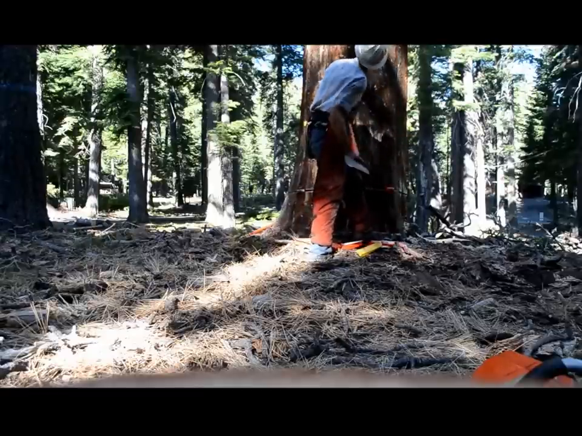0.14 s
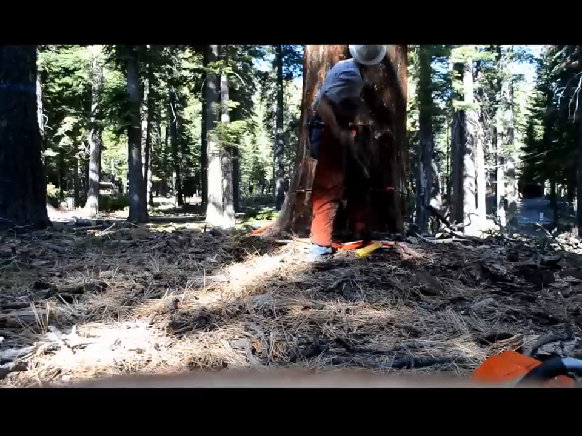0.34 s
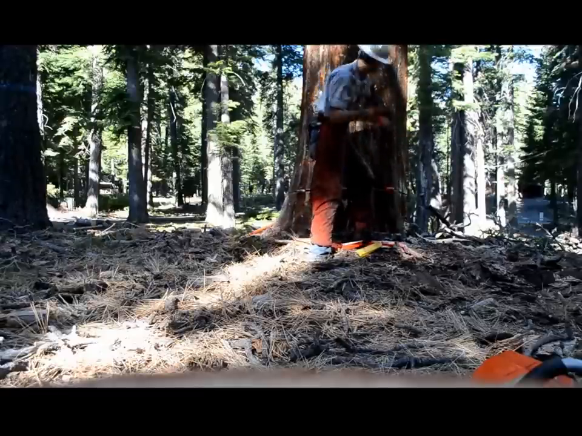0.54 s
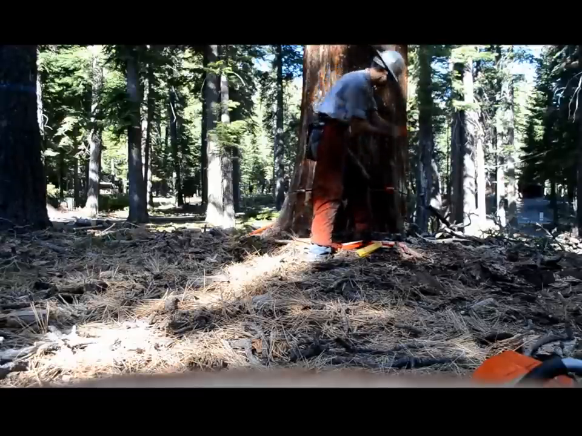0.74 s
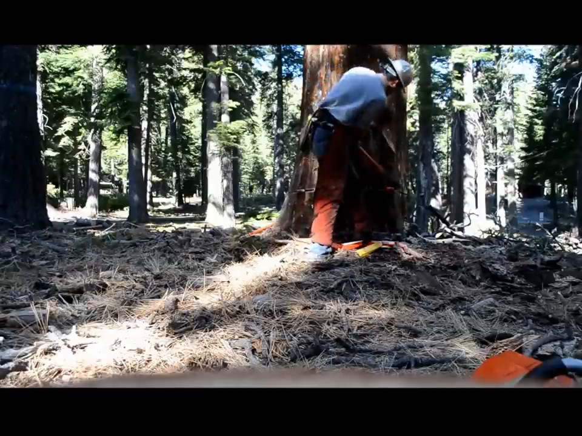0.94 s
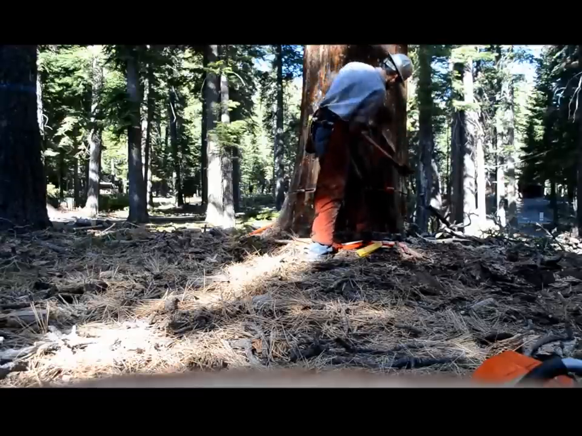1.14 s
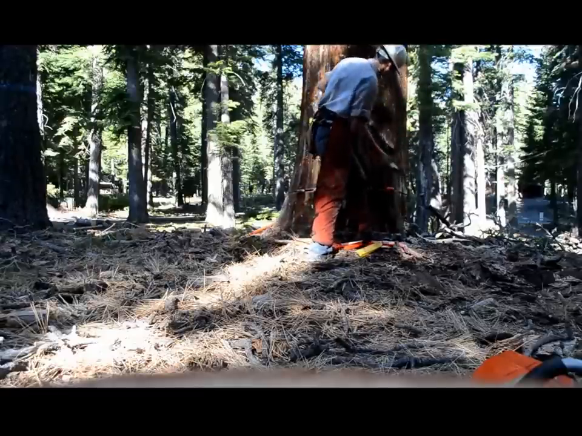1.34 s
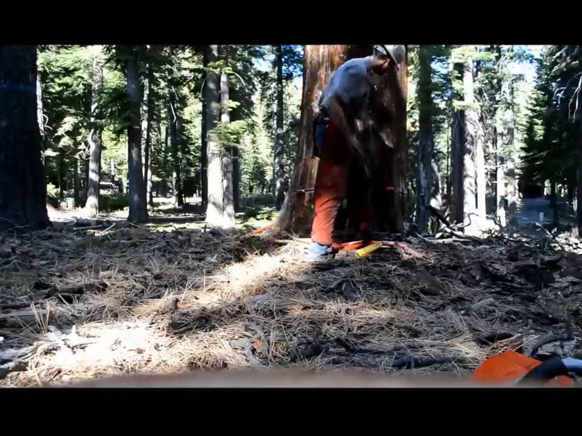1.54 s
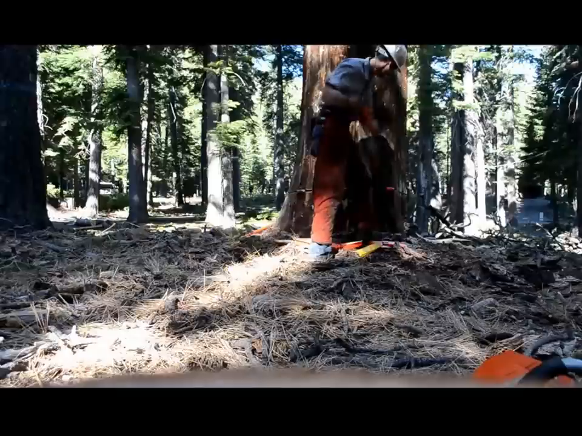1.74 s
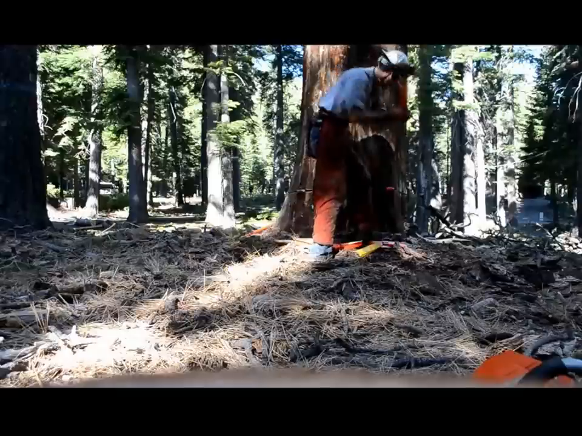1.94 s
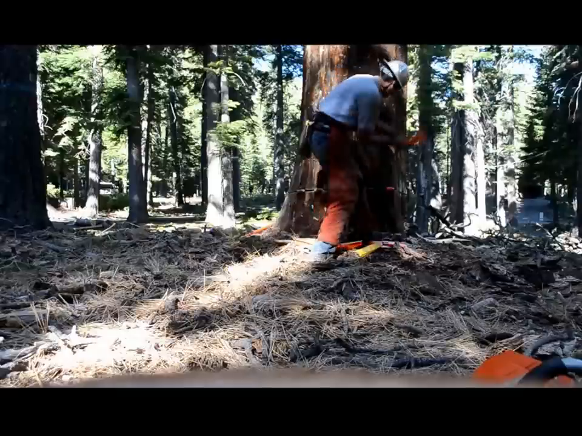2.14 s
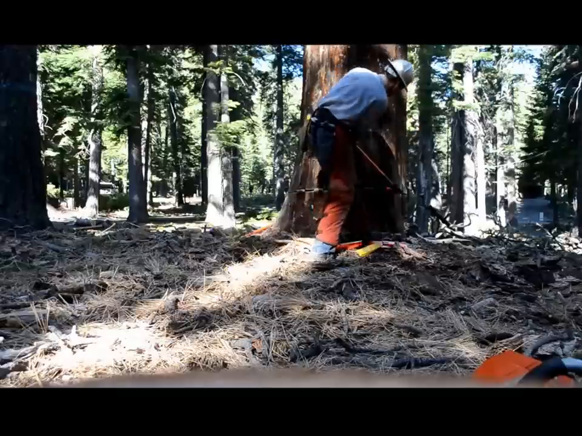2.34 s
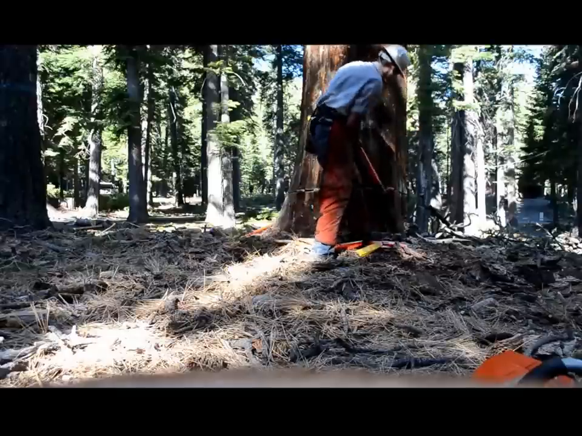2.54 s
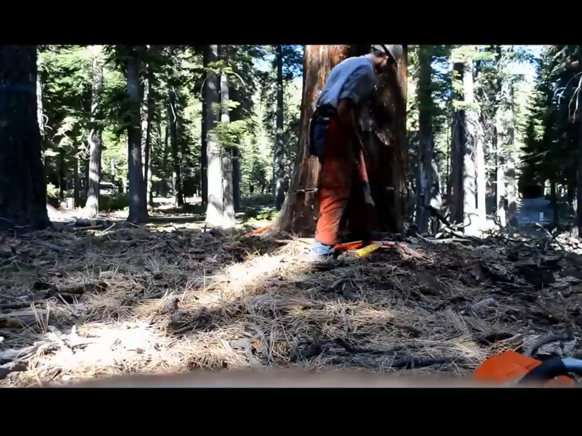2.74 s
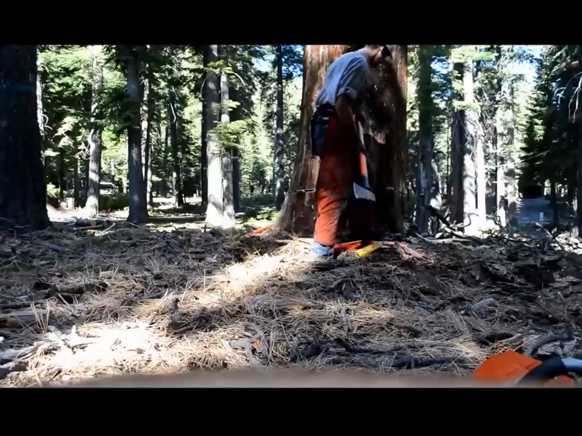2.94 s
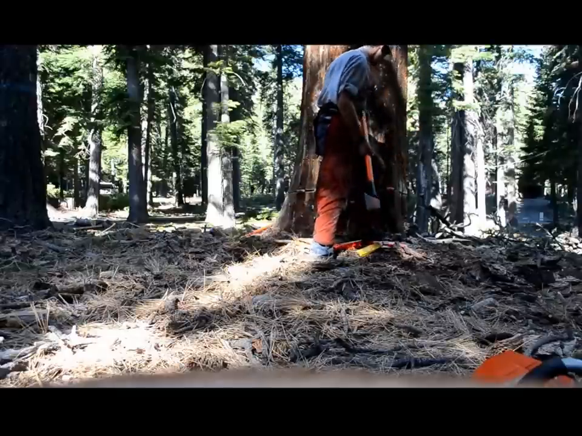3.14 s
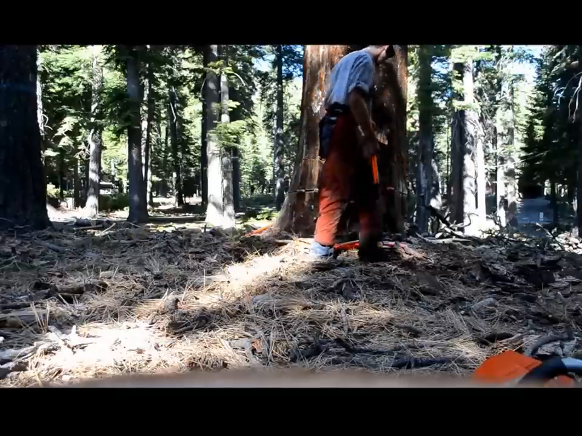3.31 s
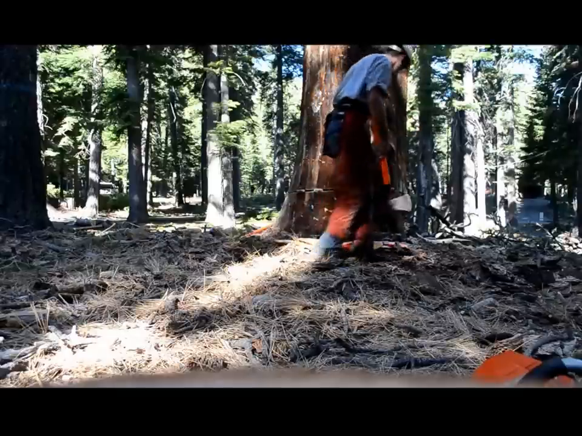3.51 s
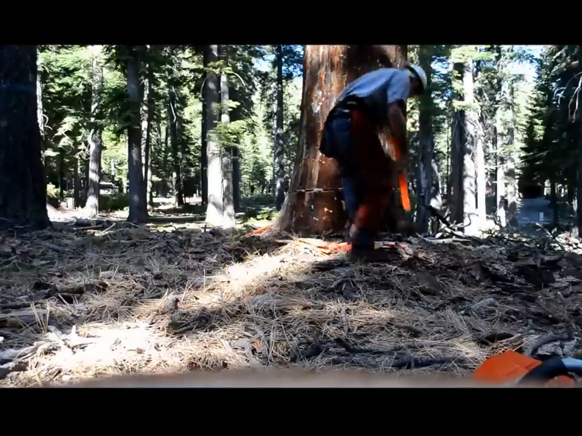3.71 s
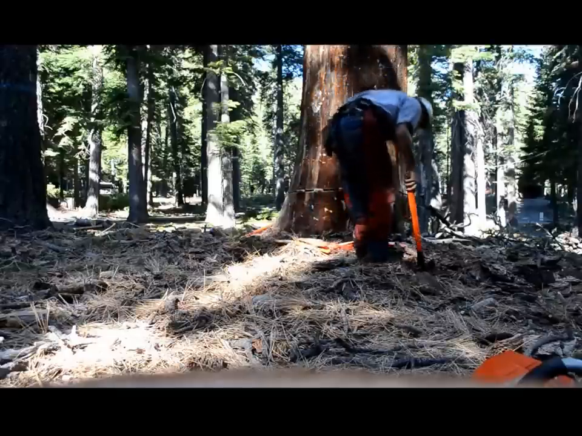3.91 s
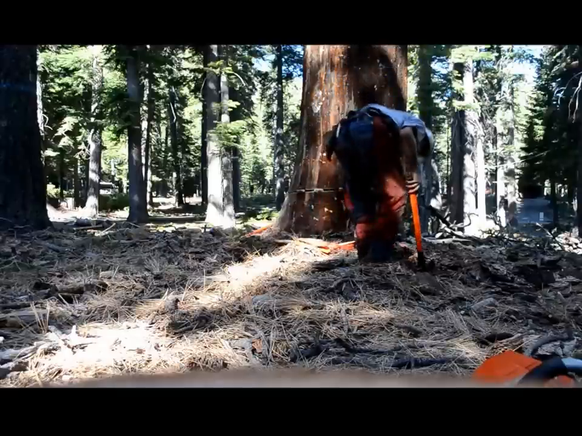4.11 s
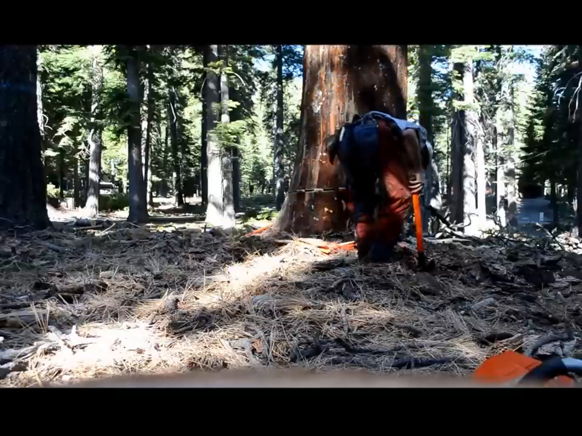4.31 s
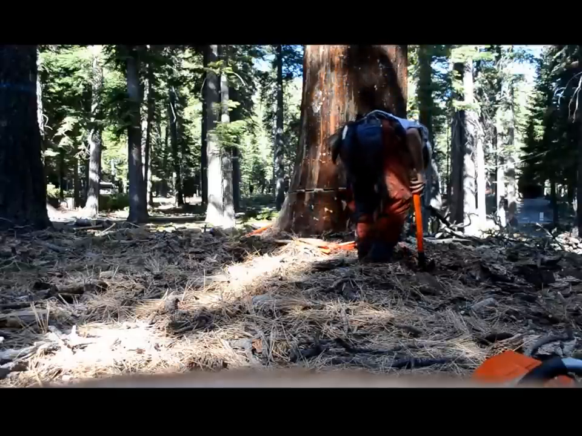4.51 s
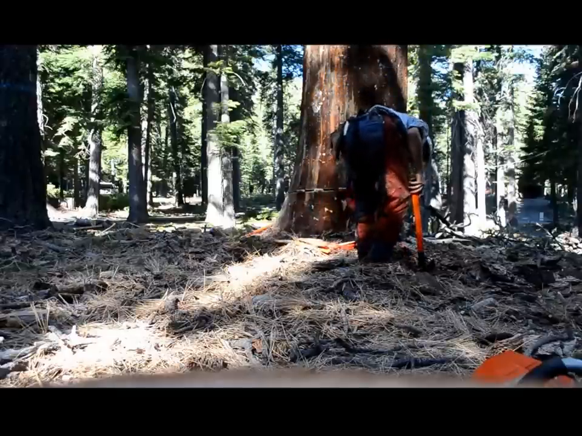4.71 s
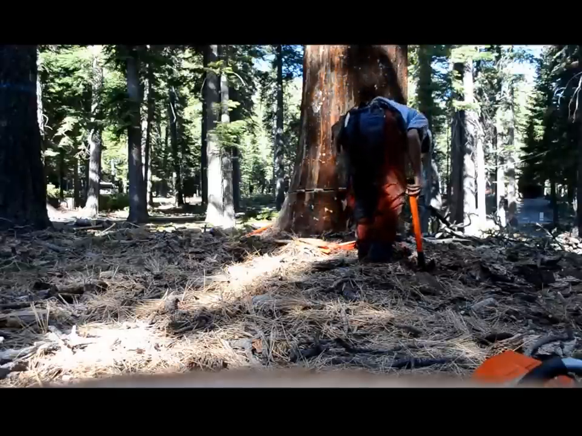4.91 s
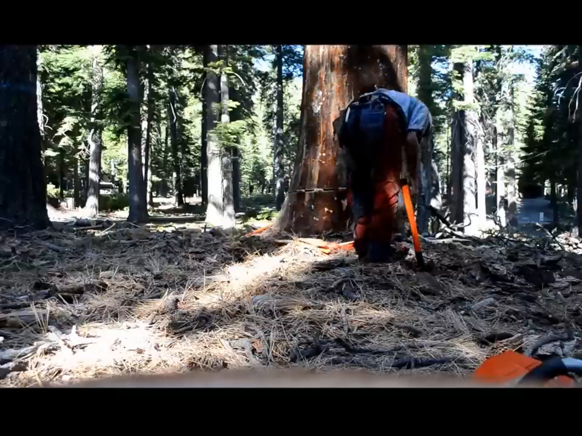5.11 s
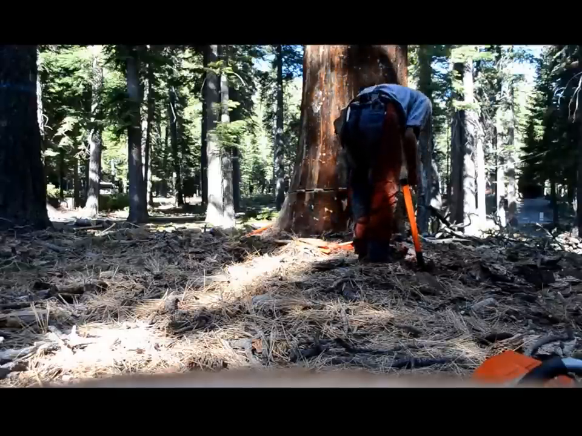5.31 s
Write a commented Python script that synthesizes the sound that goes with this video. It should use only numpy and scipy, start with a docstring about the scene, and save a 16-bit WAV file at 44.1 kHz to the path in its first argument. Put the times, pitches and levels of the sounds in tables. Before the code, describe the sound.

Two overloaded axe cracks on plastic wedges echo through a quiet conifer forest, then small twig ticks, litter rustles and a soft set-down thud.

```python
"""A quiet conifer forest, with the microphone some metres from a big trunk; an axe drives plastic wedges into it.
Each blow rings a wedge as decaying sines; the cracks overload the input and return from the trunks as echoes
and scattered noise. The axe is set down with low thuds; twigs tick and litter rustles under boots as filtered
noise, and random slips knock a loose wedge. Thin insect notes and a low hum that swells twice are wavering
sines, over the shaped noise of air in the crowns and a low rumble that stops early."""
import sys
import numpy as np
from scipy import signal
from scipy.io import wavfile
from scipy.ndimage import uniform_filter1d

SR = 44100
rng = np.random.default_rng(int(sys.argv[2]) if len(sys.argv) > 2 else 0)


def bounce(signal):
    """Save signal as a 16-bit WAV file at the path given by the first command-line argument."""
    frames = np.transpose(np.atleast_2d(signal))
    limited = np.clip(frames, -1, 1)
    pcm = np.round(limited * 32767).astype(np.int16)
    wavfile.write(sys.argv[1], SR, pcm)


N = 240863


def gain_of(db):
    """Decibels to amplitude."""
    return 10 ** (np.asarray(db) / 20)


def evened(x):
    """Scales to rms 1."""
    return x / np.sqrt(np.mean(x ** 2) + 1e-20)


def read(points, hz):
    """Interpolates the columns of a table on a log-frequency axis, each as an upright column."""
    table_hz, *columns = np.transpose(points)
    log_hz, log_table_hz = np.log(hz + 1), np.log(table_hz + 1)
    return np.array([np.interp(log_hz, log_table_hz, column) for column in columns])[:, :, None]


def add(mix, s, sound):
    """Mixes a sound in at time s, which may lie before the start."""
    at = round(s * SR)
    sound = sound[max(-at, 0):]
    part = mix[max(at, 0):][:len(sound)]
    part += sound[:len(part)]


def band(x, hz, octaves):
    """Band-pass around hz, reaching the given octaves to each side."""
    edges = np.clip([hz / 2 ** octaves, hz * 2 ** octaves], 20, SR * .45)
    return signal.lfilter(*signal.butter(2, edges, "band", fs=SR), x)


def ring(modes, tilt_db=0, spread=0.):
    """Decaying sines, each rising over about its first cycle; the tilt is in dB per octave about 1300 Hz."""
    t = np.arange(SR // 8) / SR
    total = 0
    for hz, db, t60 in modes:
        level = gain_of(db + tilt_db * np.log2(hz / 1300) - 60 * t / t60)
        rise = 1 - np.exp(-2.5 * hz * t)
        detuned_hz = hz * (1 + spread * rng.standard_normal())
        total = total + level * rise * np.sin(2 * np.pi * detuned_hz * t)
    return total


def coloured_click(points, tilt_db):
    """A causal pulse with the given spectrum: its minimum phase follows from the log gain."""
    hz = abs(np.fft.fftfreq(4096, 1 / SR))
    db = read(points, hz)[0, :, 0] + tilt_db * np.log2((hz + 30) / 1300)
    log_gain = np.log(gain_of(db))
    return np.fft.ifft(np.exp(np.conj(signal.hilbert(log_gain)))).real[:2048]


def tone(hz, db, throb_db, wobble):
    """A near sine that wavers about the given pitch (wobble: rms fraction) and rms level (throb: rms dB)."""
    draws = rng.standard_normal((SR // 2, 2))[:len(db)]
    pitch_drift, level_drift = (evened(uniform_filter1d(v, size=400)) for v in draws.T)
    turns = np.cumsum(hz * (1 + wobble * pitch_drift)) / SR
    return np.sqrt(2) * gain_of(db + throb_db * level_drift) * np.sin(2 * np.pi * turns)


def axe(echoes, scatter):
    """Every blow rings the wedge; near trunks return that ring, far trees blur it to a broad crack."""
    # Axe blows, the first before the start. Each row: start in seconds, strength in dB, treble tilt in dB per octave.
    blows = [(-.39, 9, 2.5), (0.9271, 11.5, 2.5), (2.244, 12, 3)]
    # Ring of struck wedge and trunk. Each row: pitch in Hz, level in dB before the tilt, t60 in seconds.
    wedge_modes = [(413, -14.5, 0.067), (607, -9, 0.034), (1003, -6, 0.021), (1286, 8.5, 0.01),
                   (1704, -2.5, 0.011), (2570, -5.5, 0.0023)]
    # Colour of the crack as it spreads among the trees. Each row: frequency in Hz, relative level in dB.
    snap = [(35, -65), (70, -23), (130, -27.5), (230, -11), (400, -8.5), (640, -9), (850, -13), (1050, -2),
            (1290, 2), (1650, -0.5), (2150, -10), (2800, -9.5), (3800, -19.5), (5000, -26), (9200, -34),
            (11500, -59)]
    snap_db = 22
    splinter_db, splinter_t60 = -6.5, 0.019  # short hiss of steel on plastic
    out, t = np.zeros(N), np.arange(SR // 40) / SR
    for s, db, tilt_db in blows:
        wedge = ring(wedge_modes, tilt_db, .008)
        hiss = band(rng.standard_normal(len(t)), 4700, 0.6)
        add(wedge, 0, hiss * gain_of(splinter_db - 60 * t / splinter_t60))
        crack = gain_of(snap_db) * coloured_click(snap, tilt_db)
        near_return = signal.fftconvolve(wedge, echoes)
        far_return = signal.fftconvolve(crack, scatter)
        for sound in wedge, near_return, far_return:
            add(out, s, gain_of(db) * sound)
    return out


def forest():
    """The answer of the stand to one click: single echoes, and a scatter that dies in two stages."""
    # Single echoes off the ground and near trunks. Each row: delay in seconds, level in dB.
    trunks = [(0.0066, -21), (0.0106, -21), (0.0154, -30), (0.0224, -27), (0.0298, -25), (0.0404, -33.5),
              (0.0487, -32.5), (0.0588, -31), (0.0627, -31), (0.0716, -35), (0.0774, -26.5), (0.088, -33)]
    # Decay of the echoes with delay on the way through the trees; a negative loss is a lift.
    # Each row: frequency in Hz, loss in dB per second.
    foliage = [(100, 23), (500, 10), (1300, 7), (3000, -5), (6000, 27), (11000, 78)]
    # Dense scatter from many far trees. Each row: frequency in Hz, near level in dB, near t60 in seconds,
    # far level in dB, far t60 in seconds; the levels are relative.
    scatter_bands = [(60, -18, 0.36, -59, 1.5), (201, -22.5, 0.11, -53, 1.7),
                     (503, -28.5, 0.83, -49.5, 3.6), (880, -30, 0.79, -44, 2.45),
                     (1390, -35.5, 0.69, -52.5, 2.47), (2900, -35.5, 0.8, -50.5, 1.96),
                     (5200, -32.5, 0.76, -55, 2.57), (7600, -34.5, 0.59, -65, 0.74),
                     (11100, -27.5, 0.53, -63, 1)]
    clumping = 0.39  # how far the scatter gathers around the single echoes, 0-1
    # farther trunks stand at random
    far_trunks, far_from_s, far_gap_s = 40, .095, .0066
    far_db, far_fall_db_per_s, far_spread_db = -37, 62.5, 2.5
    stft = dict(nperseg=256, noverlap=192)

    taps = np.zeros(3 * SR)
    place, size = rng.random(far_trunks), rng.standard_normal(far_trunks)
    beyond_s = far_gap_s * (np.arange(far_trunks) + place)
    far_levels_db = far_db - far_fall_db_per_s * beyond_s + far_spread_db * size
    for s, db in trunks + list(zip(far_from_s + beyond_s, far_levels_db)):
        bark = 0.57 * rng.standard_normal(96) * np.hanning(96)  # rough bark smears the treble of each echo
        add(bark, .0004, np.hanning(11) * rng.choice([-1, 1]))  # the round trunk returns the body whole
        add(taps, s, gain_of(db) * bark / np.linalg.norm(bark))

    hz, t, echoes = signal.stft(taps, SR, **stft)
    scatter = signal.stft(rng.standard_normal(3 * SR), SR, **stft)[2]
    near_db, near_t60, far_db, far_t60 = read(scatter_bands, hz)
    near_stage = gain_of(near_db - 60 * t / near_t60)
    far_stage = gain_of(far_db - 60 * t / far_t60)
    scatter *= np.hypot(near_stage, far_stage)
    energy = uniform_filter1d((abs(echoes) ** 2).sum(0), size=3, origin=1)
    clumps = (energy + 1e-7) / (uniform_filter1d(energy, size=24) + 1e-7)
    scatter *= (0.35 + clumps) ** clumping  # boughs stand where the trunks stand
    echoes *= gain_of(-read(foliage, hz)[0] * t)
    answer = signal.istft(np.array([echoes, scatter]), SR, **stft)[1]
    return answer * np.clip(np.arange(answer.shape[1]) / SR / 0.0025, 0, 1)  # nothing returns at once


def loose_wedge():
    """Bursts of random slips ring the free plastic wedge as it is scraped and knocked."""
    # Each row: start in seconds, length in seconds, rms level in dB, treble tilt in dB per octave,
    # change of slip level over the burst in dB.
    knocks = [(5.197, .019, -30, 7.5, -5), (5.2158, 0.022, -35, 3, -20)]
    # Modes of the loose wedge. Each row: pitch in Hz, relative level in dB before the tilt, t60 in seconds.
    loose_modes = [(885, -8, 0.067), (1180, -8, 0.012), (1460, 8, 0.0089), (2020, 0.5, 0.016),
                   (2260, -8, 0.021), (2620, -9, .07), (3180, -3, .014), (4900, -7, .011),
                   (3470, -3.5, 0.0091), (4250, -9, 0.0095), (5800, -10, 0.0043), (6930, -12.5, 0.0041),
                   (8400, -18, .005), (8900, -30, .005)]
    out = np.zeros(N)
    for s, length, db, tilt_db, fade_db in knocks:
        draws = rng.standard_normal((SR // 20, 2))[:round(length * SR)]
        slip_db = 3.0 * draws[:, 1] + fade_db * np.linspace(0, 1, len(draws))
        slips = draws[:, 0] * gain_of(slip_db)
        ringing = signal.fftconvolve(slips, ring(loose_modes, tilt_db))
        sound = band(ringing, 2600, 1.5)  # too small to radiate bass
        add(out, s, gain_of(db) * sound / sound[:len(draws)].std())
    return out


def underfoot():
    """Ticks are decaying noise bands, rustles grainy noise of uneven strength, thuds two low modes each."""
    # Twig and needle ticks. Each row: start in seconds, peak in dB, centre in Hz, half width in octaves,
    # t60 in seconds of the noise before its band-pass.
    ticks = [(.175, -38, 9000, .5, .02), (0.196, -34.5, 4740, 0.79, 0.034), (.272, -45, 8850, .4, 0.017),
             (.291, -36, 1700, 0.91, .02), (.3215, -39.5, 9000, .4, .015), (0.7108, -26, 3000, 2.4, 0.0059),
             (.744, -38.5, 4000, 0.63, .02), (2.108, -41, 6500, 0.45, 0.015),
             (2.856, -34.5, 7600, 0.35, 0.0054), (3.565, -32.5, 8600, .6, 0.006),
             (3.843, -34, 5000, 1.3, 0.0065), (4.06, -44, 8450, 0.32, 0.011), (4.294, -50, 9500, .3, .012),
             (4.587, -41, 4000, 0.71, 0.017), (4.781, -32.5, 2000, .9, 0.03),
             (4.824, -37, 3480, 0.52, 0.021), (5.19, -36, 2500, .6, 0.011)]
    # Litter under boots. Each row: start in seconds, length in seconds, rms in dB before the taper, centre in Hz.
    rustles = [(0.14, 0.099, -56.5, 7700), (0.278, 0.057, -52, 3000), (2.08, 0.034, -66, 7040),
               (3.272, 0.052, -64, 6030), (3.654, 0.16, -52.5, 7140), (3.814, 0.085, -54, 6000),
               (4.345, 0.064, -50.5, 3460), (4.353, 0.024, -41, 1700), (4.727, 0.029, -49, 1860),
               (4.38, .3, -60.5, 2820), (4.781, .022, -45, 1850), (5.313, .12, -59, 2200)]
    # Boots and axe head on the ground. Each row: start in seconds, lower mode level in dB,
    # its pitch in Hz, its t60 in seconds.
    thuds = [(2.03, -60, 89, 0.053), (3.2915, -40, 147, 0.047), (3.293, -38, 623, 0.023),
             (3.845, -49, 130, 0.072)]
    out, t = np.zeros(N), np.arange(SR // 20) / SR
    for s, db, hz, octaves, t60 in ticks:
        tick = band(rng.standard_normal(len(t)) * gain_of(-60 * t / t60), hz, octaves)
        add(out, s, gain_of(db) * tick / abs(tick).max())
    for s, length, db, hz in rustles:
        draws = rng.standard_normal((SR // 2, 2))[:round(length * SR)]
        grains = draws[:, 0] * gain_of(5.6 * draws[:, 1])
        rustle = evened(band(grains, hz, 0.44))
        add(out, s, gain_of(db) * rustle * signal.windows.tukey(len(grains), .7))
    for s, db, hz, t60 in thuds:
        add(out, s, ring([(hz, db, t60), (1.92 * hz, db + 2, t60 * 0.8)]))
    return out


def insects():
    """High thin notes, wavering sines: each swells fast, then fades over its length."""
    # Each row: start in seconds, length in seconds, rms level in dB before the fades, pitch in Hz.
    notes = [(0.58, 0.25, -60, 7600), (1.944, 0.19, -64.5, 7600), (3.16, 0.22, -60.5, 7585),
             (3.81, .075, -54, 7740), (3.895, .17, -63, 7605), (4.675, .08, -70, 8580),
             (4.76, 0.064, -57, 8575), (5.415, .06, -59, 8585)]
    rise_s, fade_db = .025, -14
    out = np.zeros(N)
    for s, length, db, hz in notes:
        t = np.arange(0, length, 1 / SR)
        edges = np.clip(np.minimum(t, length - t) / rise_s, 0, 1)
        add(out, s, edges * tone(hz, db + fade_db * t / length, 2.5, .0025))
    return out


def hums():
    """A low hum, a wavering sine whose level and pitch swell and sink along one arch."""
    # Each row: start in seconds, length in seconds, rms level at the top in dB, top pitch in Hz.
    swells = [(4.703, 0.17, -60, 253), (5.3, 0.12, -57, 214)]
    ends_db, sag = -5, .13  # further drop in level and fraction of pitch lost at the ends
    out = np.zeros(N)
    for s, length, db, hz in swells:
        arch = np.sin(np.pi * np.arange(0, length, 1 / SR) / length)
        pitch_hz = hz * (1 - sag * (1 - arch))
        add(out, s, np.sqrt(arch) * tone(pitch_hz, db + ends_db * (1 - arch), 1.2, .011))
    return out


def hush():
    """Air in the crowns: random short-time spectra with faint drifting patches."""
    # Colour of the hush. Each row: frequency in Hz, relative density in dB per Hz.
    colour = [(18, -77), (30, -23), (125, -23.5), (186, -7.5), (425, -5), (588, -3.5), (1070, -1.5),
              (1240, -3), (1480, -5.5), (2270, -6.5), (6160, -19), (8740, -19.5), (11800, -34.5),
              (15300, -73), (22000, -120)]
    hush_db = -49  # rms
    frames, hz = N // 256 + 5, np.fft.rfftfreq(1024, 1 / SR)
    real, imaginary, patches = rng.standard_normal((frames, 513, 3)).T
    patches = uniform_filter1d(patches, size=14, axis=0)  # across frequency
    patches = evened(uniform_filter1d(patches, size=16, axis=1))  # across time
    spectra = (real + 1j * imaginary) * gain_of(read(colour, hz)[0] + .7 * patches)
    air = signal.istft(spectra, nperseg=1024, noverlap=768)[1][:N]
    return gain_of(hush_db) * evened(air)


def rumble():
    """Narrow low noise that stops early with a short fade."""
    rumble_db, ends_s, fade_s = -72.5, 0.81, .1  # rms before the fade, start and length of the fade
    noise = band(band(rng.standard_normal(N), 93, 0.64), 93, 0.64)
    fade = np.clip(1 - (np.arange(N) / SR - ends_s) / fade_s, 0, 1)
    return evened(noise) * gain_of(rumble_db) * fade


def scene():
    """Everything as it reaches the microphone; the sounds close by also excite the scatter of the stand."""
    echoes, scatter = forest()
    near = underfoot() + loose_wedge()
    near = near + gain_of(-13) * signal.fftconvolve(near, scatter)[:N]
    return (axe(echoes, scatter) + near + hush() + rumble() + insects() + hums())[None]


def record(dry):
    """The capsule cuts bass and top and dips in the treble; the input clips loud peaks; then the band limit."""
    capsule_hz, low_cut_hz, edge_hz = 11100, 51, 16200
    capsule = signal.firwin(127, capsule_hz, window=("kaiser", 9), fs=SR)
    heard = signal.oaconvolve(dry, capsule[None], "same")
    heard = signal.lfilter(*signal.butter(2, low_cut_hz, "high", fs=SR), heard)
    heard = heard - .5 * signal.lfilter(*signal.iirpeak(7950, 14, fs=SR), heard)  # narrow dip, half the amplitude
    clipped = np.clip(heard, -.985, .985)
    band_limit = signal.firwin(255, edge_hz, window=("kaiser", 5), fs=SR)
    return signal.oaconvolve(clipped, band_limit[None], "same")


dry = scene()
out = record(dry)
bounce(out)
```